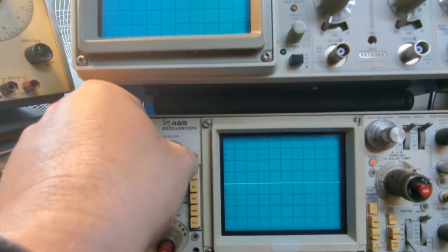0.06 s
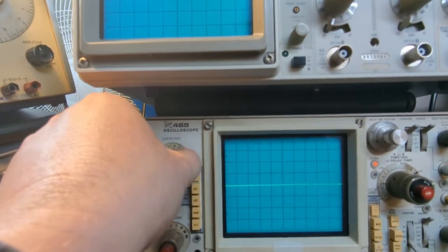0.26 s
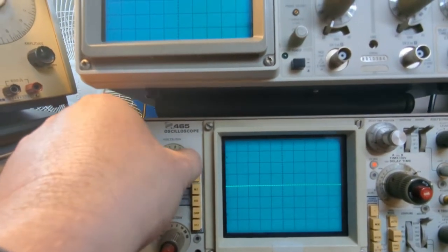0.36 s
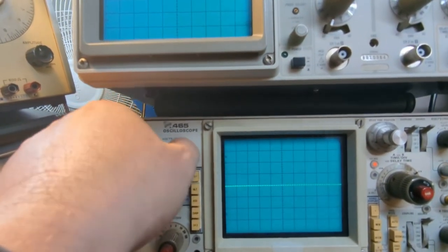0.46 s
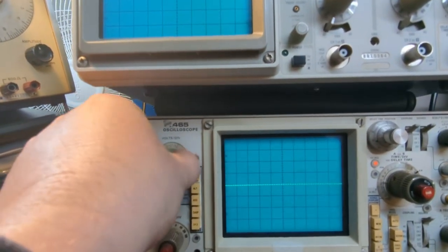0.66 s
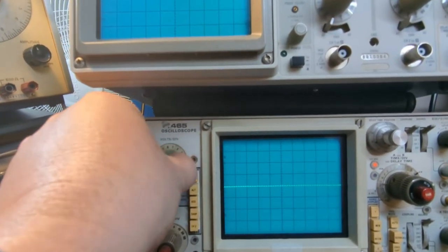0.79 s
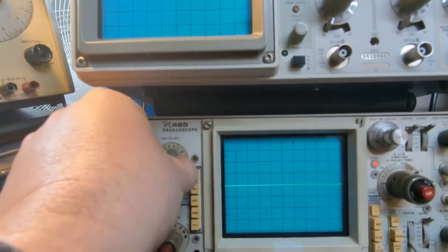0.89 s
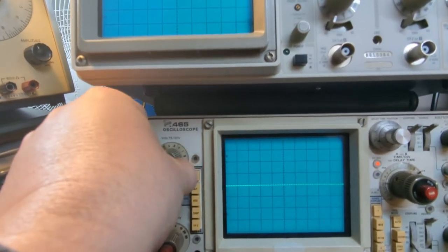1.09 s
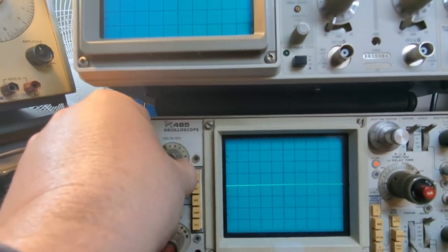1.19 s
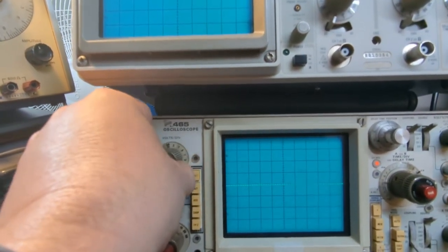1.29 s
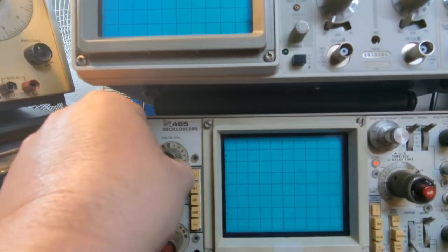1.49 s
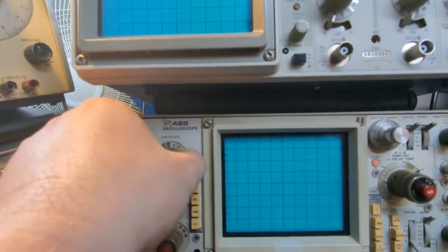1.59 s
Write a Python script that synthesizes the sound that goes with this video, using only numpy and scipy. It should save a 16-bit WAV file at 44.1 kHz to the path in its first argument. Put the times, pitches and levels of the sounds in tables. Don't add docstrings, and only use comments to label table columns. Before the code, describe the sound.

Rotary switch clicking through five crisp metallic detents, close up, over a faint fan hum indoors

```python
import sys
import numpy as np
from scipy import signal
from scipy.fft import rfft, irfft
from scipy.io import wavfile
from scipy.ndimage import uniform_filter1d

SR = 44100
rng = np.random.default_rng(int(sys.argv[2]) if len(sys.argv) > 2 else 0)


def undo_db(level):
    steps = np.asarray(level, float) / 20
    return 10 ** steps


def store_pcm(level_fs):
    pcm = np.round(np.clip(level_fs, -1, 1) * 32767).astype(np.int16)
    wavfile.write(sys.argv[1], SR, np.atleast_2d(pcm).T)


N = 72765

# start in seconds, then case, panel and rattle levels in dB.
CLICKS = [
    (0.2141, -35, -28.5, -27),
    (0.71, -35, -27.5, -27),
    (0.8733, -35, -31, -29),
    (1.0467, -36.5, -29, -34),
    (1.3405, -41.5, -40, -33.5),
]
# climb in dB per ms, level in dB against the click.
SCRAPES = [(1.5, -25.5), (2.45, -12.5), (2.8, -15), (3, -17), (4.5, -27)]
SEATS = [(0.093, -2, -1.3, 0, 0.6), (1, 0.25, 2.6, 0, 1), (-2.2, -1.1, -2, 0, 1),
         (-0.51, -0.76, -1.8, 0, -1.7), (-0.67, 1, 0.89, 2.5, -1.3)]
SEAT_HZ = [900, 1350, 2900, 4600, 15000]
SEAT_FLAT_HZ = [550, 2000, 6400, 11500]
# pitch in Hz, level in dB.
CASE = [(520, 2), (591, 2.5), (750, 3), (900, -3), (945, -1.5), (1095, -8)]
# pitch in Hz, level in dB.
PANEL = [(1180, -10), (1320, -7.5), (1400, -10), (1480, -10), (1720, -4), (1810, -4), (1930, 3), (1995, 0),
         (2160, -5), (2350, -2), (2430, -4), (2610, -16), (2930, -7), (3210, -16)]
# pitch in Hz, level in dB.
SPRING = [(3360, -1), (3760, -16), (6210, 6.5), (6620, 12), (9900, -11), (11750, -2)]
# frequency in Hz, level in dB per Hz.
CRACK = [(1200, -9), (2600, 0), (4200, -10.5), (6400, -0.5), (8200, -10.5), (11800, 0), (13200, -6),
         (16000, -4.5)]
# frequency in Hz, phase in turns.
APART = [(600, .04), (1000, .15), (1400, .32), (4000, .4)]
# frequency in Hz, left minus right in dB.
LEAN = [(180, -3.5), (550, -6.5), (1000, -4), (2000, -5), (3200, 3.5), (5000, 0.5), (15000, -0.5)]
# start in seconds, level in dB, length in seconds, pitch in Hz.
CREAKS = [(.398, -68, .012, 1900), (.408, -66, .016, 1400), (.410, -65, .014, 2300),
          (.457, -72, .003, 5500), (.538, -69, .022, 2800), (.598, -61, .016, 2050),
          (1.028, -58, .007, 2000), (1.620, -57, .014, 1000), (1.619, -61, .014, 2000),
          (1.633, -65, .017, 2650), (1.633, -69, .017, 1500)]
# frequency in Hz, time to fall by 60 dB in seconds.
ROOM = [(500, 0.9), (1100, 0.49), (2000, 0.26), (3000, 0.34), (6400, 0.19), (14000, 0.16)]
# multiple of the shaft speed, level in dB.
FAN = [(7, -17), (13, -11), (16, -15), (17, -19), (19, -9), (20, -12), (22, -17), (23, -13), (24, -7),
       (25, -18), (27, -17), (28, 0), (29, -7), (30, -8), (31, -21), (32, -11), (34, -18), (35, -13),
       (36, -8), (37, -14), (38, -15), (40, -25), (44, -27)]
# pitch in Hz, width in Hz, level in dB, steady share from 0 to 1.
DRONES = [(88.3, 0.67, -61, 1), (120.3, 14, -66.5, 0.0066), (150.1, 10.6, -71.5, 0.18)]
# frequency in Hz, likeness up to 1.
SAME = [(60, .94), (180, .92), (350, .75), (700, .86), (1500, .35), (3000, 0)]
# frequency in Hz, level in dB per Hz.
AIR = [(20, -41), (45, -16), (100, 5), (170, -6.5), (300, -9), (600, -14), (1000, -13), (1150, -32.5)]
# frequency in Hz, level in dB per Hz.
HISS = [(680, -45), (1150, 1.5), (1930, -1.5), (2290, -2.5), (2790, -9.5), (9030, -18), (15800, -25.5)]

EARLY_S = .02


def evened(x):
    return x / np.sqrt(np.mean(x ** 2) + 1e-20)


def sized(x):
    return x * np.sqrt(.01 * SR * len(x)) / np.linalg.norm(x)


def read(points, hz):
    f, value = np.transpose(points)
    return np.interp(np.log(hz + 1), np.log(f + 1), value)


def add(mix, s, sound):
    part = mix[..., round(s * SR):][..., :sound.shape[-1]]
    part += sound[..., :part.shape[-1]]


def colour(x, db_of):
    hz = abs(np.fft.fftfreq(4096, 1 / SR))
    log = np.log(undo_db(np.maximum(db_of(hz), -100)))
    taps = np.fft.ifft(np.exp(np.conj(signal.hilbert(log)))).real[:2048]
    return signal.oaconvolve(x, taps)[:len(x)]


def resonate(x, hz, width):
    turn = np.exp(2j * np.pi * hz * np.arange(x.shape[-1]) / SR)
    r = np.exp(-np.pi * width / SR)
    return 2 * (turn * signal.lfilter([1 - r], [1, -r], x / turn)).real


def bass(x):
    return signal.sosfiltfilt(signal.butter(2, 800, fs=SR, output="sos"), x)


def lean(left, right):
    return np.array([colour(left, lambda hz: read(LEAN, hz) / 2),
                     colour(right, lambda hz: -read(LEAN, hz) / 2)])


def snap(case_db, panel_db, rattle_db, climb, scrape_db, seat_db):
    rise_s, hold_s = .0015, .0015
    rattle_t60, settle_t60, blow_t60 = .031, .024, .017
    case_t60, panel_t60, spring_t60 = .14, .047, .015
    case_lag_s, panel_lag_s = .001, .0008
    slips_per_s, spread_db, shared = 14000, 2.5, .45
    t = np.arange(9000) / SR - EARLY_S
    seat = sorted(list(zip(SEAT_HZ, seat_db)) + [(hz, 0) for hz in SEAT_FLAT_HZ])

    after = np.maximum(t - hold_s, 0)
    up = np.clip(1 + t / rise_s, 0, 1) ** 2
    hit = up * (undo_db(-60 * after / rattle_t60) + undo_db(-26.5 - 60 * after / settle_t60))
    scrape = undo_db(scrape_db + climb * 1000 * np.minimum(t + rise_s, 0)) * (t < 0)

    chance, sign, size = rng.random((len(t), 3, 3)).T
    slips = (chance < slips_per_s / SR) * np.sign(sign - .5) * undo_db(-spread_db * np.log(1 - size))
    pair = np.sqrt(shared) * slips[0] + np.sqrt(1 - shared) * slips[1:]
    pair = rfft(pair * (hit + scrape))
    smooth_power = uniform_filter1d(abs(pair) ** 2, size=160, axis=1)
    pair = irfft(pair / np.sqrt(smooth_power), len(t))
    crack = [colour(x, lambda hz: read(CRACK, hz) + read(seat, hz)) for x in pair]
    crack = sized(np.array(crack))

    blow = slips[0] * (up * undo_db(-60 * after / blow_t60) + scrape)
    blow = np.roll(blow, round(panel_lag_s * SR))
    thump = 1. * (np.arange(len(t)) == round((EARLY_S + case_lag_s) * SR))
    sound = undo_db(case_db - 1) * ring(CASE, case_t60, thump, seat)
    sound = sound + undo_db(panel_db + 2) * ring(PANEL, panel_t60, blow, seat)
    sound = sound + undo_db(rattle_db) * crack
    sound = sound + undo_db(rattle_db - 8.5) * ring(SPRING, spring_t60, slips[0] * hit, seat)
    return lean(*sound)


def ring(modes, t60, knocks, seat):
    drift, spread_db = .0067, 1.47
    t, out = np.arange(len(knocks)) / SR, 0
    luck = rng.standard_normal((len(modes), 3))
    for k, ((hz, db), u) in enumerate(zip(modes, luck)):
        skew = read(APART, hz) * (1 + .3 * u[2]) * np.array([[.5], [-.5]])
        turns = hz * (1 + drift * u[1]) * t + k / 2 + skew
        mode = undo_db(-60 * t / t60) * np.sin(2 * np.pi * turns)
        rung = signal.fftconvolve(knocks[None], mode, axes=1)[:, :len(t)]
        out = out + undo_db(db + read(seat, hz) + spread_db * u[0]) * sized(rung)
    return out / np.linalg.norm(undo_db(np.transpose(modes)[1]))


def blended(sound):
    power = uniform_filter1d((abs(rfft(sound)) ** 2).mean(0), size=30)
    return np.roll(irfft(np.sqrt(abs(power)), sound.shape[1]), round(.023 * SR))


def creak(level_db, length, hz):
    width = .5 * hz
    t = np.arange(3000) / SR
    slips = abs(rng.standard_normal(len(t))) * rng.standard_normal(len(t)) * (t < length)
    sound = resonate(resonate(slips, hz, width), hz, width)
    return undo_db(level_db) * sound / np.sqrt(np.sum(sound ** 2) / (length * SR))


def bench(x):
    fade_s, left_late_s, level_db = .0016, .00052, -2
    t = np.arange(600) / SR
    taps = rng.standard_normal((2, 600)) * (rng.random((2, 600)) < .25)
    taps = taps * np.exp(-t / fade_s) * (t > .0003)
    taps = undo_db(level_db) * taps / np.linalg.norm(taps, axis=1)[:, None]
    taps[:, 0] = 1
    left, right = signal.oaconvolve(x[None], taps, axes=1)[:, :N]
    low = bass(left)
    left = low + np.roll(left - low, round(left_late_s * SR))
    return lean(left, right)


def room(x):
    gap_s = .0024
    out, t = np.zeros((2, N)), np.arange(N) / SR
    for k in range(3):
        hz, s, z = signal.stft(rng.standard_normal((2, SR // 2)), SR, nperseg=128)
        fading = z * undo_db(-60 * s / read(ROOM, hz)[:, None])
        tail = signal.istft(fading, SR, nperseg=128)[1]
        tail = tail * np.clip(t[:tail.shape[1]] / gap_s, 0, 1)
        turn = np.sqrt(2 / 3) * np.cos(np.pi * (t / .5 + k / 3))
        out += signal.fftconvolve((x * turn)[None], tail / np.linalg.norm(tail[0]), axes=1)[:, :N]
    return out


def fan():
    shaft_hz, level_db, wobble_db = 26.29, -61, 3
    twist = .17
    t, out = np.arange(N) / SR, np.zeros((2, N))
    for order, db in FAN:
        u = rng.random(4)
        hz = order * shaft_hz
        wobble = wobble_db * np.sin(2 * np.pi * ((.5 + 2 * u[0]) * t + u[1]))
        skew = np.arccos(np.clip(read(SAME, hz), -1, 1)) * np.sign(u[3] - .5)
        turns = hz * t + twist * order ** 2 + .31 * u[2]
        out += undo_db(db + wobble) * np.sin(2 * np.pi * turns + skew * np.array([[.5], [-.5]]))
    out = out * np.sqrt(2) * undo_db(level_db - max(db for _, db in FAN))
    for hz, width, db, steady in DRONES:
        a, b, c = rng.standard_normal((3, N))
        pair = np.array([a + .22 * b, a + .29 * c])
        fuzz = evened(resonate(resonate(pair, hz, width), hz, width))
        out += undo_db(db) * (steady * np.sin(2 * np.pi * hz * t) + (1 - steady) * fuzz)
    return out


def noise(shape, patchy_db):
    frames, hz = N // 256 + 5, np.fft.rfftfreq(1024, 1 / SR)
    a, b, c, d, patch = rng.standard_normal((frames, 513, 5)).T
    patch = uniform_filter1d(patch, size=14, axis=0)
    patch = evened(uniform_filter1d(patch, size=6, axis=1))
    same = np.clip(read(SAME, hz), -1, 1)[:, None]
    left = a + 1j * b
    right = same * left + np.sqrt(1 - same ** 2) * (c + 1j * d)
    z = np.array([left, right]) * undo_db(read(shape, hz)[:, None] + patchy_db * patch)
    return evened(signal.istft(z, nperseg=1024, noverlap=768)[1][:, :N])


def scene():
    switch, fingers = np.zeros((3, N)), np.zeros(N)
    for (s, *levels), scrape, seat in zip(CLICKS, SCRAPES, SEATS):
        sound = snap(*levels, *scrape, seat)
        add(switch, s - EARLY_S, np.vstack([sound, blended(sound)]))
    for s, *rest in CREAKS:
        add(fingers, s, creak(*rest))
    switch = signal.sosfilt(signal.butter(4, 430, "high", fs=SR, output="sos"), switch)
    left, right = switch[:2] + bench(fingers) + undo_db(-14.5) * room(switch[2] + fingers)
    side = (left - right) / 2
    side = side - .7 * bass(side)
    heard = (left + right) / 2 + side * np.array([[1], [-1]])
    air = undo_db(-62.5) * noise(AIR + [(1800, -74.5)], patchy_db=1.2)
    return heard + fan() + air


def top_cut(x):
    return signal.sosfilt(signal.butter(12, 16980, fs=SR, output="sos"), x)


def record(dry):
    gate_db, knee_db, depth_db, gate_s = -64, 5, -18, .008
    high = signal.sosfiltfilt(signal.butter(2, 2500, "high", fs=SR, output="sos"), dry)
    power = abs(uniform_filter1d((high ** 2).mean(0), round(gate_s * SR)))
    level_db = 10 * np.log10(power + 1e-12)
    shut = np.clip((gate_db - level_db) / knee_db, 0, 1)
    hiss = undo_db(-72.5) * noise([(700, -46.5)] + HISS, patchy_db=.8)
    gated = dry - high * (1 - undo_db(depth_db * shut)) + hiss
    edged = signal.oaconvolve(gated, signal.firwin(255, 16050, fs=SR)[None], "same")
    mix = edged + .022 * (gated - edged)
    return top_cut(mix)


dry = scene()
out = record(dry)
store_pcm(out)
```